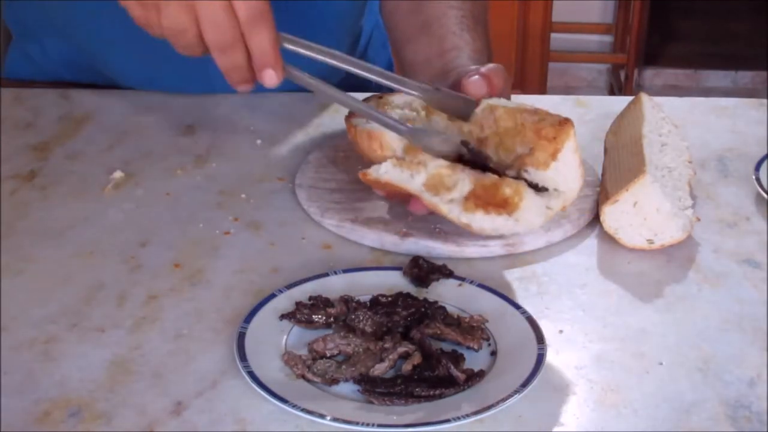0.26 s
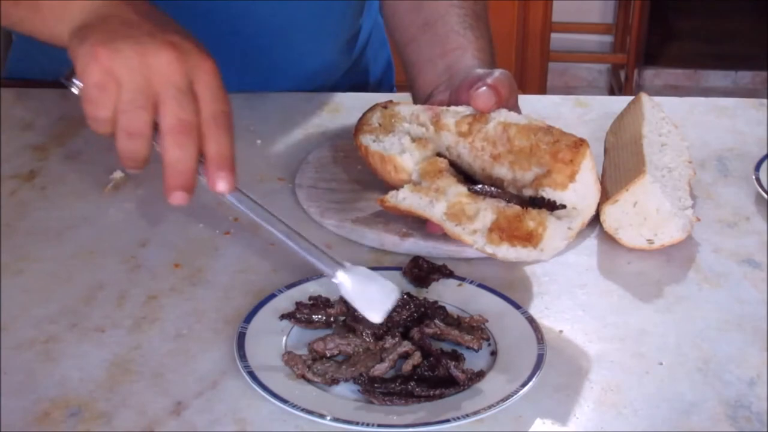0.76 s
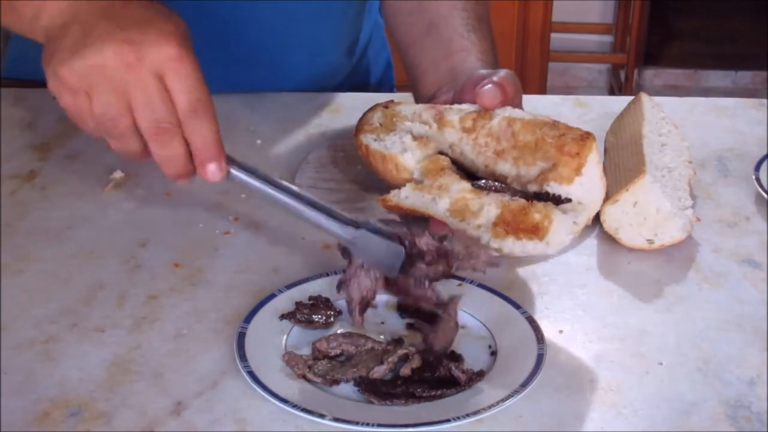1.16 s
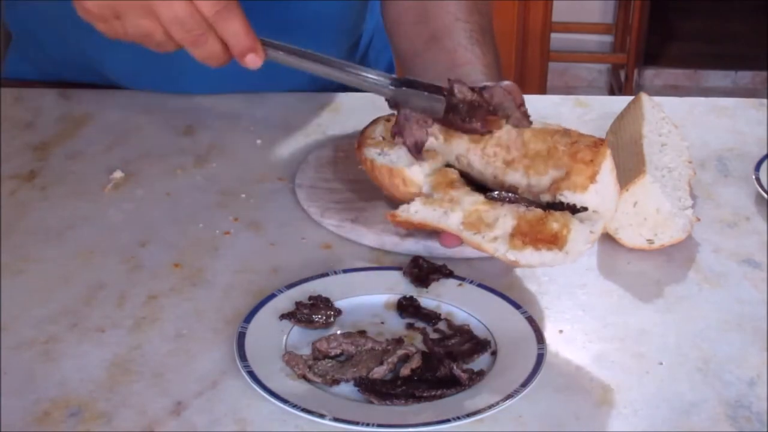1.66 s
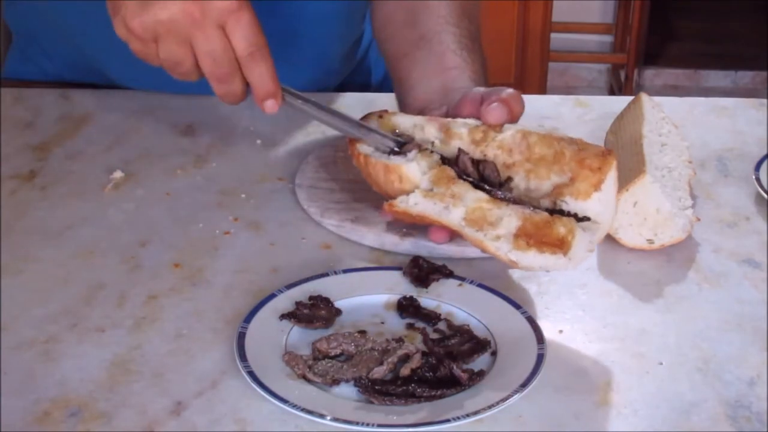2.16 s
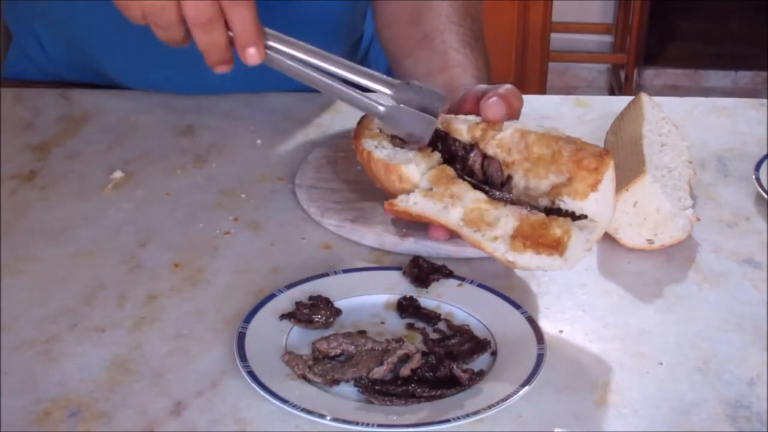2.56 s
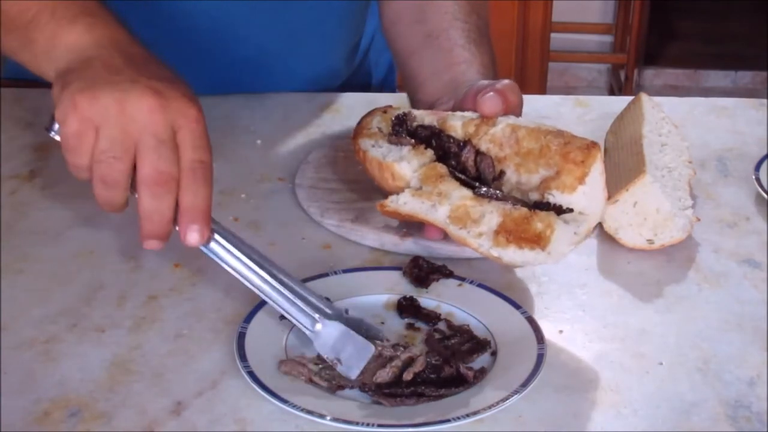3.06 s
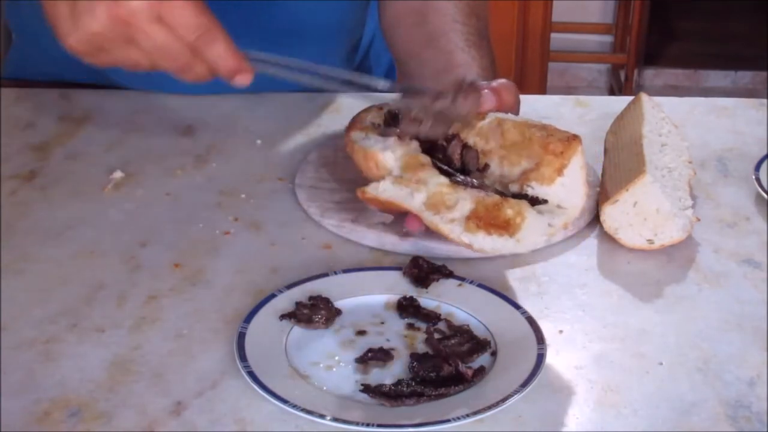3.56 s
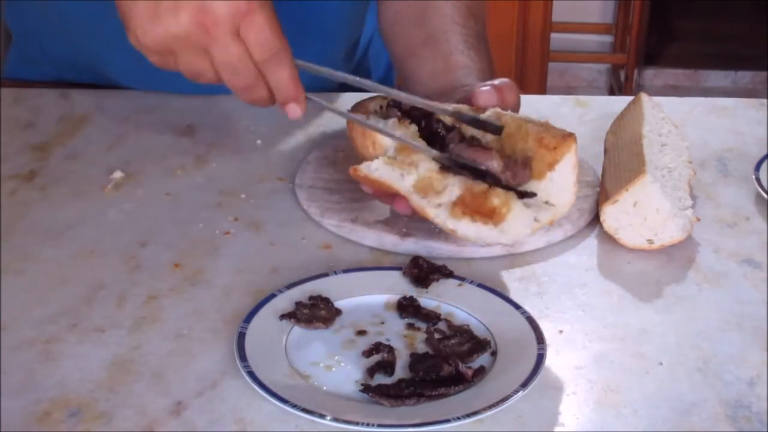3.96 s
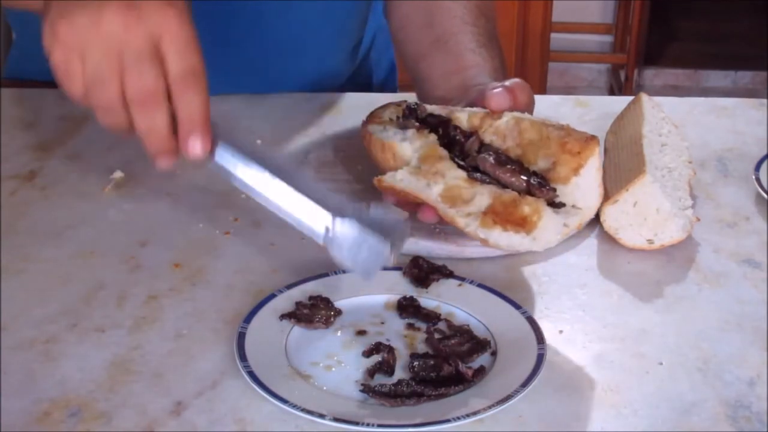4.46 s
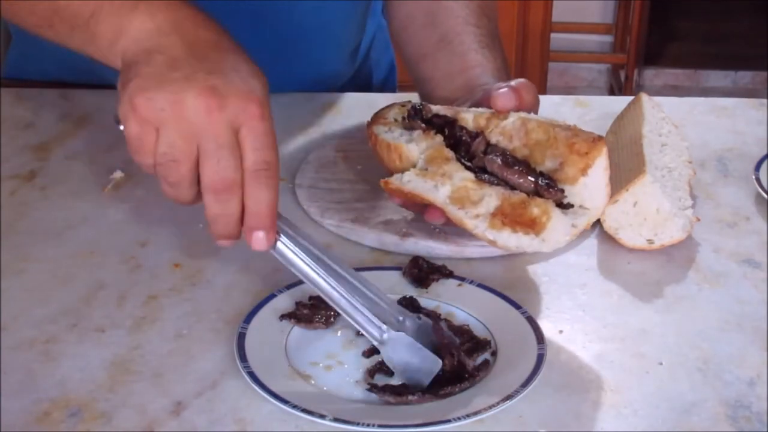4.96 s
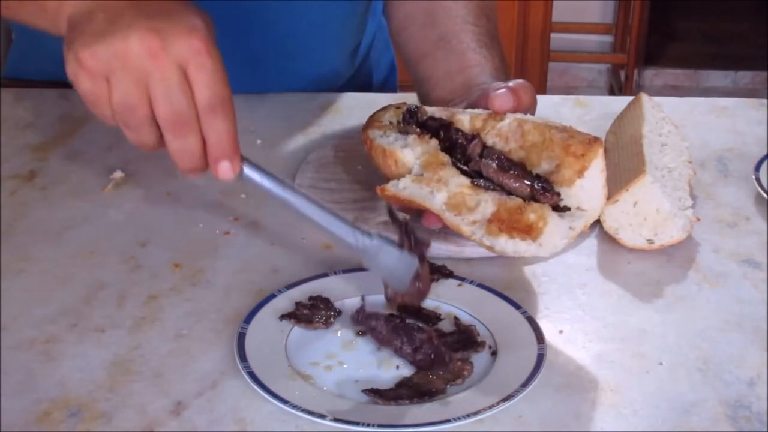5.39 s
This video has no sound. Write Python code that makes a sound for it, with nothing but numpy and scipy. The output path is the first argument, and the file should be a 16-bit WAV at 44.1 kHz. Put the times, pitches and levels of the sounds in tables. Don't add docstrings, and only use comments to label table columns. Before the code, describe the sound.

Steel tongs strike a ceramic plate twice, bright and ringing, with lighter clinks and tiny hinge clicks between, over a soft refrigerator hum.

```python
import sys
import numpy as np
from scipy import signal
from scipy.fft import rfft, irfft
from scipy.io import wavfile
from scipy.ndimage import uniform_filter1d

SR = 44100
rng = np.random.default_rng(int(sys.argv[2]) if len(sys.argv) > 2 else 0)


def store_pcm(level_fs):
    pcm = np.round(np.clip(level_fs, -1, 1) * 32767).astype(np.int16)
    wavfile.write(sys.argv[1], SR, np.atleast_2d(pcm).T)


def ratio_of_db(decibels):
    return 10 ** (np.asarray(decibels, float) / 20)


N = 248283


def at_hz(points, hz):
    table = np.array(points)
    return np.interp(np.log(hz), np.log(table[:, 0]), table[:, 1])


def rms_one(x):
    return x / np.sqrt(np.mean(x ** 2) + 1e-20)


def add(out, s, sound):
    i = round(s * SR)
    out[i:i + len(sound)] += sound[:N - i]


def band_noise(white, low, high):
    return signal.sosfilt(signal.butter(2, [low, high], "band", fs=SR, output="sos"), white)


def drift(rate):
    hop = 40
    r = np.exp(-2 * np.pi * rate * hop / SR)
    slow = signal.lfilter([1], [1, -2 * r, r * r], rng.standard_normal(N // hop + 2002))[2000:]
    return np.interp(np.arange(N) / hop, np.arange(len(slow)), rms_one(slow))


def swells(rows):
    t = np.arange(N) / SR
    return sum(height * np.exp(-8 * ((t - s) / length) ** 2) for s, length, height in rows)


def ring(hz, db, t60, rise_s=0.0013):
    t = np.arange(SR // 2) / SR
    return ratio_of_db(db - 60 * t / t60) * (1 - np.exp(-t / rise_s)) * np.sin(2 * np.pi * hz * t)


def dying_noise(spectrum, t60, seconds):
    t = np.arange(int(seconds * SR)) / SR
    edges = 150 * 2 ** np.arange(0, 6.8, 1 / 3)
    white, out = rng.standard_normal((2, SR)), 0
    for k, (low, high) in enumerate(zip(edges, edges[1:])):
        band = band_noise(white[k % 2, :len(t)], low, high)
        out = out + band * ratio_of_db(at_hz(spectrum, np.sqrt(low * high)) - 60 * t / at_hz(t60, low))
    return out


# (time [s], peak level [dB])
BLOWS = [
    (0.8625, -10.5),
    (3.019, -4.5),
]
# (pitch [Hz], level [dB], time to die by 60 dB [s])
FIRST_RING = [(1584, -16.5, 0.1), (2160, -3.5, 0.097), (2289, -13, 0.45), (2830, -3.5, 0.056),
              (3505, -24, 0.29), (3694, -2, 0.1), (3693, -11.5, 0.076), (4495, -14.5, 0.093),
              (5280, -15, 0.11), (6280, -33, 0.18), (6470, -7, 0.089), (6910, 3, 0.036), (7660, -22, 0.2),
              (8300, -26, 0.22), (8450, -20, 0.49), (9000, -39, 1.0), (9160, -10, 0.16), (8760, -17, 0.12),
              (9870, -8, 0.1), (10770, -6, 0.052), (11000, -32, 0.2), (10400, -27, 0.29),
              (10700, -29, 0.25), (11800, -32, 0.16), (11910, -34, 0.23), (13300, -15, 0.14),
              (14100, -19, 0.28), (14250, -14, 0.14), (14450, -28, 0.27), (14880, -18, 0.19)]
# (pitch [Hz], level [dB], time to die by 60 dB [s])
SECOND_RING = [(1196, -20, 0.13), (1870, -20, 0.42), (2154, -7.5, 0.19), (2307, -10.5, 0.17),
               (2205, -3, 0.071), (2610, -22, 0.16), (2514, -0.5, 0.071), (2700, -0.5, 0.046),
               (3457, -5.5, 0.091), (3660, -27, 0.073), (3650, -4.5, 0.15), (3720, -14, 0.26),
               (4680, -20, .2), (4580, -19.5, 0.12), (5490, -15, 0.21), (6100, -0.5, 0.079),
               (6290, -7.5, 0.087), (6562, -20, 0.14), (6920, -10, 0.18), (7036, -9, 0.1),
               (8430, -11.5, 0.44), (8800, -30, .16), (8855, -1.5, 0.078), (9200, -16, 0.24),
               (9850, -8, .1), (10900, -14.5, .12), (11770, -9.5, 0.1), (13424, -11, 0.19),
               (14130, -8, 0.11), (15300, -2, 0.18)]
# (pitch [Hz], level per Hz [dB])
CRACK = [(300, -42), (700, -30), (1200, -2.5), (1700, -6), (2400, 0.5), (3100, -8.5), (3700, -13),
         (4500, -13), (6500, -5.5), (10000, -11), (15000, -7)]
DAMPING = 0.65


def blows():
    out = np.zeros(N)
    for (s, db), modes, crack_db in zip(BLOWS, (FIRST_RING, SECOND_RING), (-3, -2)):
        crack = dying_noise(CRACK, [(300, 0.12), (15000, 0.017)], seconds=0.5)
        add(out, s, ratio_of_db(db + crack_db) * crack)
        split = rng.uniform(0.0065, 0.0352, len(modes)) * rng.choice([-1, 1], len(modes))
        for (hz, mode_db, t60), apart in zip(modes, split):
            own_t60 = DAMPING * min(t60, 0.6) * (2300 / hz) ** 0.45
            mode = ring(hz, db + mode_db - 7, own_t60)
            twin = ring(hz * (1 + apart), db + mode_db - 14, own_t60)
            add(out, s, mode + twin)
    return out


# (time [s], peak level [dB], pitch [Hz], rim ring level [dB], rim pitch [Hz])
ROCKS = [(0.866, -28, 690, -36, 1216), (0.884, -33, 674, -39, 1380), (0.908, -57, 665, -53, 1560),
         (3.03, -21, 744, -29.5, 1240), (3.058, -54, 770, -30.5, 1203), (3.071, -32, 670, -38, 1503),
         (3.094, -38, 305, -41, 980), (3.129, -38, 690, -41, 1224), (3.183, -60, 657, -33.5, 1372),
         (3.23, -62, 638, -53, 1300), (4.179, -38.5, 760, -48.5, 1350), (4.21, -38, 260, -52, 1370),
         (4.248, -46, 538, -54, 1240)]
# (pitch [Hz], level [dB], time to die by 60 dB [s])
COUNTER = [(276, -0.5, 0.19), (314, -3.5, 0.29), (471, -1, 0.086), (580, 0.5, 0.088), (691, 1, 0.11),
           (740, -0.5, 0.076)]


def rocking():
    out = np.zeros(N)
    for s, db, hz, rim_db, rim_hz in ROCKS:
        add(out, s, ring(rim_hz, rim_db + 7, 0.024, rise_s=0.00037))
        for mode_hz, mode_db, t60 in COUNTER:
            octaves_away = abs(np.log2(mode_hz / hz))
            level_db = db + mode_db - 7.5 - 6.5 * octaves_away
            add(out, s, ring(mode_hz, level_db, t60, rise_s=0.0043))
    return out


SPOT_LOSS_DB_PER_OCTAVE, FAINTEST_DB = 30, -75


def ticks(touches, groups, home, snap_db):
    out = np.zeros(N)
    snap = dying_noise(CRACK, [(300, 0.02), (15000, 0.017)], seconds=0.05)
    pitches = np.array([modes[0][0] for modes in groups])
    for s, home_db, spot_hz, spot_db in touches:
        octaves_away = np.abs(np.log2(pitches / spot_hz))
        strengths_db = np.maximum(spot_db - SPOT_LOSS_DB_PER_OCTAVE * octaves_away, FAINTEST_DB)
        strengths_db[home] = max(home_db, strengths_db[home])
        add(out, s, ratio_of_db(np.mean(strengths_db) + snap_db) * snap)
        for db, modes in zip(strengths_db, groups):
            add(out, s, sum(ring(hz, db + mode_db + 5.0, t60) for hz, mode_db, t60 in modes))
    return out


# (time [s], lowest modes' level [dB], pitch of the spot touched [Hz], its level [dB])
PLATE_TICKS = [(1.1453, -47, 6900, -70), (1.1974, -44, 5000, -54), (1.25, -56, 6100, -64),
               (1.3229, -45, 6300, -51), (1.328, -52, 3400, -54), (1.37, -52, 3400, -70),
               (3.1314, -24, 4300, -50), (3.152, -48, 4600, -42), (3.1822, -19, 5900, -36.5),
               (3.2296, -28.5, 3430, -50), (5.0085, -54, 3430, -66), (5.1674, -48, 3950, -50.5),
               (5.49, -57, 3430, -71), (5.53, -55, 3400, -71)]
# (pitch [Hz], level [dB], time to die by 60 dB [s])
PLATE = [
    [(2330, -12, 0.025), (2360, -5, 0.039)],
    [(3430, 0.5, 0.068), (3680, -1, 0.05)],
    [(4592, 1, 0.062), (5260, -1.5, 0.042)],
    [(5970, -4, 0.057), (6900, -14, 0.063)],
    [(8240, -3, 0.078), (11700, -13, 0.027)],
]


def plate_ticks():
    return ticks(PLATE_TICKS, PLATE, home=0, snap_db=6.0)


# (time [s], highest modes' level [dB], pitch of the spot touched [Hz], its level [dB])
HINGE_TICKS = [(0.1501, -72, 2680, -61), (0.19, -72, 2680, -55), (0.2294, -70, 8100, -55),
               (0.24, -72, 2680, -55), (0.3122, -59, 8420, -58), (0.335, -66, 5100, -60),
               (0.3544, -54, 5100, -58), (0.3794, -54, 5100, -57), (0.9874, -42, 8420, -47),
               (0.989, -60, 5100, -51), (1.1794, -71, 8420, -56), (2.1301, -72, 2680, -55),
               (2.2648, -72, 2680, -56), (2.3526, -68, 2680, -60), (2.4794, -64, 8420, -61),
               (2.4944, -56, 8800, -52), (2.6584, -62, 7900, -52), (2.6744, -52, 7550, -47),
               (4.0786, -64, 2680, -58), (4.082, -70, 5100, -64), (4.1094, -64, 5100, -58),
               (4.14, -70, 5100, -66), (4.1794, -58, 3450, -45.5), (5.2969, -68, 8050, -52),
               (5.3867, -64, 8420, -59), (5.4594, -66, 8420, -65)]
# (pitch [Hz], level [dB], time to die by 60 dB [s])
TONGS = [
    [(2680, -8, .1), (3690, -7, .2), (4120, -12, .08)],
    [(5100, -1, .09), (5350, -7, .03)],
    [(6600, 0, .05), (7500, -5, .025)],
    [(8420, 0, .04), (8700, -4, .02)],
    [(10100, -5, .02), (12950, -1, .02), (13500, -2, .02), (14800, -5, .02)],
]


def hinge_ticks():
    return ticks(HINGE_TICKS, TONGS, home=-1, snap_db=22.0)


# (pitch [Hz], time to die by 60 dB [s])
KITCHEN_T60 = [(200, 0.053), (530, 0.45), (1390, 0.32), (3680, 0.4), (9700, 0.27)]


def kitchen(x):
    tail = dying_noise([(150, -5.5), (15000, 2.5)], KITCHEN_T60, seconds=0.7)
    tail = tail * (1 - np.exp(-np.arange(len(tail)) / SR / 0.00043))
    return signal.fftconvolve(x, tail / np.sqrt(np.sum(tail ** 2)))[:N]


# (middle time [s], length [s], level [dB])
LEANS = [(0.226, 0.43, -57), (0.61, 0.24, -55.5), (0.857, 0.32, -53), (1.957, 0.18, -60),
         (2.263, .35, -55.5), (2.78, 0.6, -56), (3.06, 0.28, -66), (4.22, 0.29, -56), (4.647, 0.52, -57.5),
         (4.95, 0.36, -65)]


def leaning():
    out = 0
    for hz, db, t60 in COUNTER[:2]:
        b, a = signal.iirpeak(hz, 14.0, fs=SR)
        once = signal.lfilter(b, a, rng.standard_normal(N))
        out = out + signal.lfilter(b, a, once)
    return swells([(s, length, ratio_of_db(db - 2.5)) for s, length, db in LEANS]) * rms_one(out)


# (middle time [s], length [s], rise of the rustle [dB])
PRESSES = [(.22, 0.26, 2), (1.15, 0.9, 1.5), (2.22, 0.64, 3), (4.18, 0.67, 2), (5.15, 0.13, -0.5),
           (5.52, .2, 1)]
# (middle time [s], length [s], rise of the hiss [dB])
FLEXES = [(.33, 0.27, 2.5), (1.2, 0.27, 1.5), (2.4, 0.67, 3), (2.66, 0.32, 2), (4.15, .3, 3),
          (5.3, 0.47, 4)]
# (pitch [Hz], level per Hz [dB])
AIR_COLOUR = [(20, -10), (45, -21.5), (90, -9.5), (130, -12), (250, -10), (450, -11), (700, -11),
              (1000, -13), (2500, -18), (4200, -22), (5000, -26.5), (6500, -29), (10000, -31.5),
              (15000, -38)]
RUMBLE_DB, RUSTLE_DB, HISS_DB = -55, -60.5, -61.5
RUMBLE_FOLLOWS = 0.92


def air(patchy_db, grain_db):
    pressed_db, stirred = swells(PRESSES), swells(FLEXES)
    edges = 20 * 2 ** np.arange(0, 9.7, 1 / 3)
    white = rng.standard_normal((2, N))
    groups, crackle = np.zeros((3, N)), drift(25)
    for k, (low, high) in enumerate(zip(edges, edges[1:])):
        band = band_noise(white[k % 2], low, high)
        level_db = at_hz(AIR_COLOUR, np.sqrt(low * high)) + patchy_db * drift(8)
        groups[np.searchsorted([1200, 4800], low)] += band * ratio_of_db(level_db)
    rumble_db = RUMBLE_DB - 3.0 + RUMBLE_FOLLOWS * pressed_db + 0.29 * drift(2.2)
    hiss_db = HISS_DB + stirred * (0.5 + grain_db * np.maximum(crackle, -0.3))
    rumble = ratio_of_db(rumble_db) * rms_one(groups[0])
    rustle = ratio_of_db(RUSTLE_DB + pressed_db) * rms_one(groups[1])
    hiss = ratio_of_db(hiss_db) * rms_one(groups[2])
    return rumble + rustle + hiss


# (multiple [1], rms level [dB])
SHAFT_ORDERS = [(2, -59), (3, -76.5), (4, -72.5), (6, -79), (7, -79), (10, -79), (11, -63.5), (12, -78),
                (13, -71)]
# (pitch [Hz], rms level [dB], width [Hz])
WHINE = [
    (360.6, -69, 4.13),
    (538.3, -68, 8.65),
    (750, -75.5, 4.34),
]
SHAFT_HZ, MAINS_HUM_HZ, FAN_HZ = 49.36, 99.983, 91.524
MAINS_HUM_DB, FAN_DB = -69, -74
MAINS_IN_STEP_S, FAN_IN_STEP_S = 0.316, 0.073


def fridge():
    turn = 2 * np.pi * np.arange(N) / SR
    out = sum(ratio_of_db(db) * np.cos(k * SHAFT_HZ * turn + k * k - 4) for k, db in SHAFT_ORDERS)
    for hz, db, s in [(MAINS_HUM_HZ, MAINS_HUM_DB, MAINS_IN_STEP_S), (FAN_HZ, FAN_DB, FAN_IN_STEP_S)]:
        out = out + ratio_of_db(db) * np.cos(hz * turn - 2 * np.pi * s * (hz - 2 * SHAFT_HZ))
    for hz, db, width_hz in WHINE:
        level = ratio_of_db(db + 4.1 * drift(17))
        wandering_hz = hz + width_hz * drift(6.65)
        out = out + level * np.sin(2 * np.pi * np.cumsum(wandering_hz) / SR)
    return np.sqrt(2) * out


def scene():
    no_bass = signal.butter(4, 230, "high", fs=SR, output="sos")
    heavy = signal.sosfilt(no_bass, blows() + rocking())
    light = hinge_ticks() + plate_ticks()
    echoes = ratio_of_db(0.5) * kitchen(heavy + 0.5 * light)
    background = leaning() + fridge() + air(patchy_db=1.18, grain_db=0.78)
    return (heavy + light + echoes + background)[None]


# (time [s], lowest pitch touched [Hz], share of tones kept [0-1])
STARVED = [(1.622, 2500, 0.3), (1.813, 1000, 0.13), (1.942, 2000, 0.45), (2.687, 900, 0.08),
           (2.838, 1000, 0.15), (3.116, 700, 0.1), (3.264, 500, 0.3), (3.415, 2000, 0.2),
           (3.669, 1000, 0.1), (3.795, 1200, 0.11), (3.863, 2500, 0.14), (3.946, 1000, 0.13),
           (4.548, 2500, 0.3), (4.563, 2500, 0.4), (4.887, 1200, 0.04), (5.161, 900, 0.14)]


def thin_out(x):
    out, size = x.copy(), round(0.031 * SR)
    hz = np.fft.rfftfreq(size, 1 / SR)
    for s, low_hz, kept in STARVED:
        i = round(s * SR) - size // 2
        lines = rfft(out[i:i + size] * np.hanning(size))
        strength = np.abs(lines)
        relief = uniform_filter1d(strength, size=3) / uniform_filter1d(strength, size=220)
        relief = relief / (1 + (hz / 11000) ** 2)
        weak = (relief < np.quantile(relief, 1 - np.clip(kept, 0, 1))) & (hz > low_hz)
        out[i:i + size] -= irfft(lines * weak, size)
    return out


def band_limit(x):
    return signal.sosfilt(signal.butter(12, 16150, fs=SR, output="sos"), x)


def record(dry):
    rounded = np.tanh(dry[0] / 1.1) * 1.1
    no_top = signal.ellip(12, 0.1, 75, 14950, fs=SR, output="sos")
    mix = signal.sosfilt(no_top, thin_out(rounded))
    return band_limit(mix[None])


dry = scene()
out = record(dry)
store_pcm(out)
```